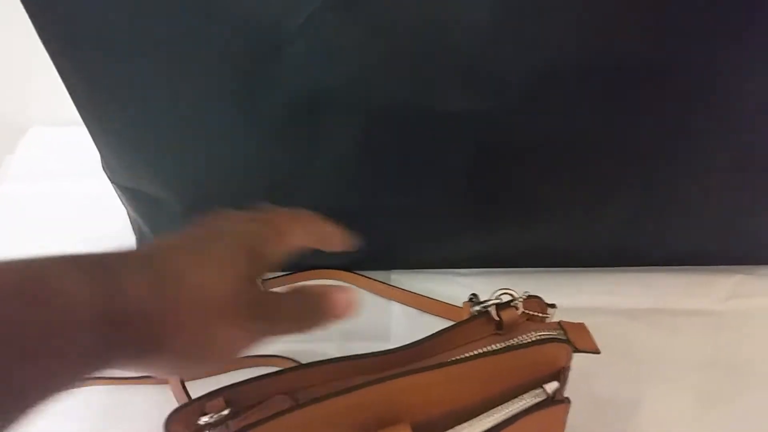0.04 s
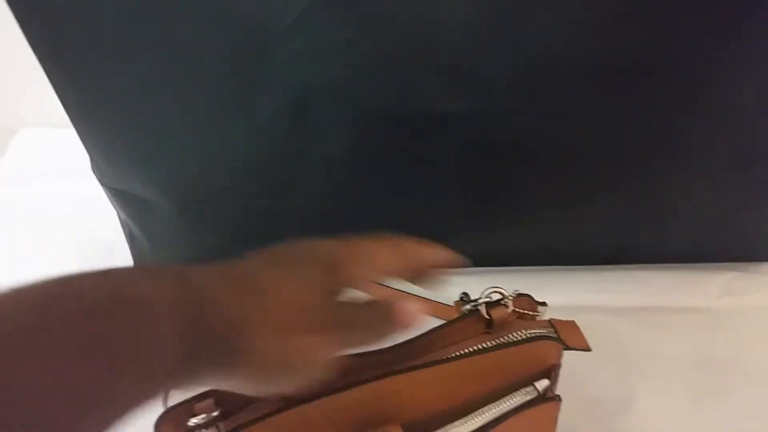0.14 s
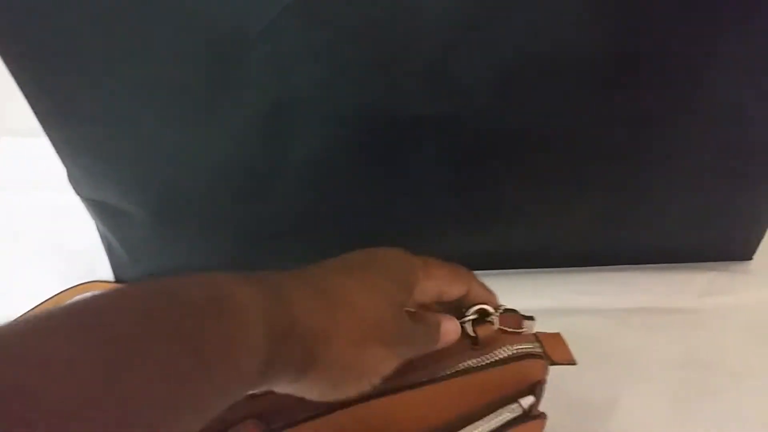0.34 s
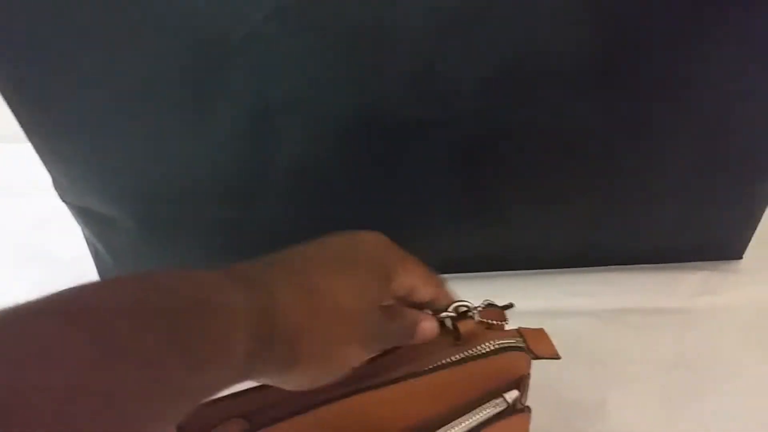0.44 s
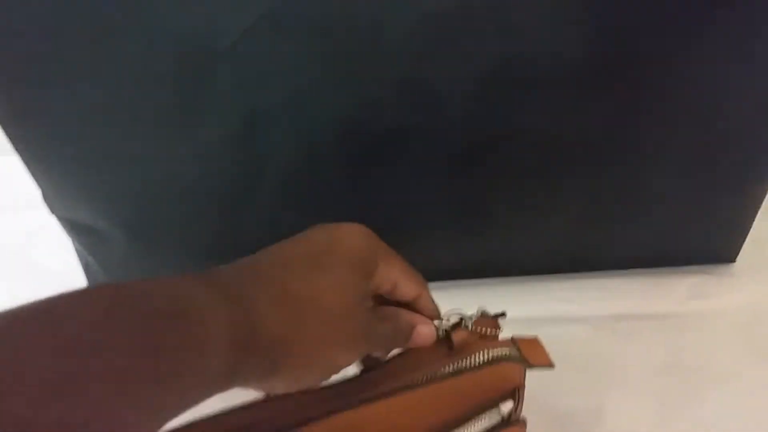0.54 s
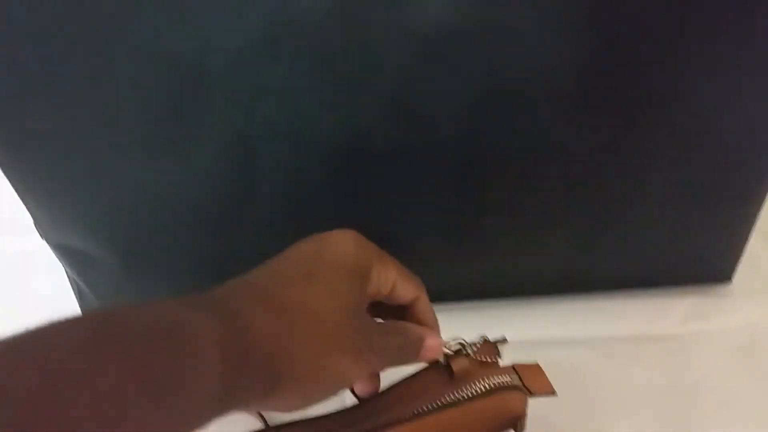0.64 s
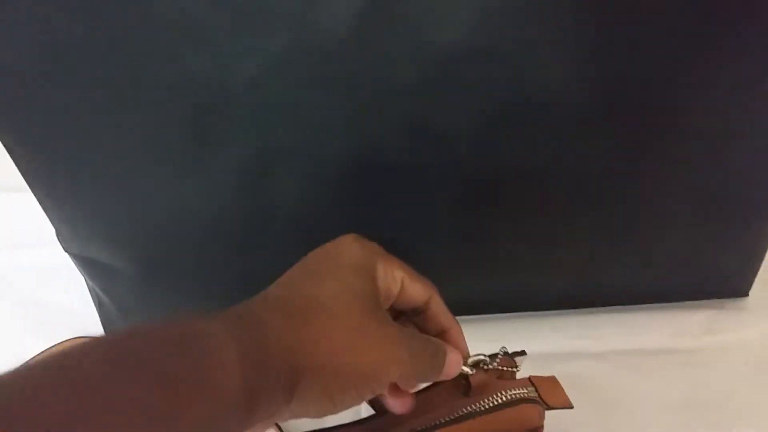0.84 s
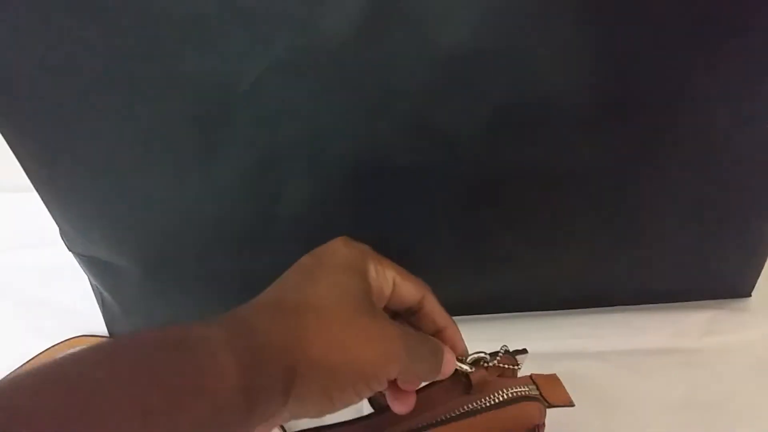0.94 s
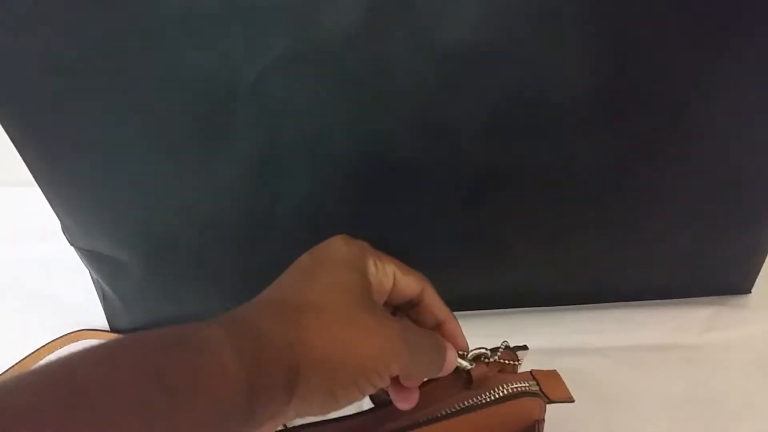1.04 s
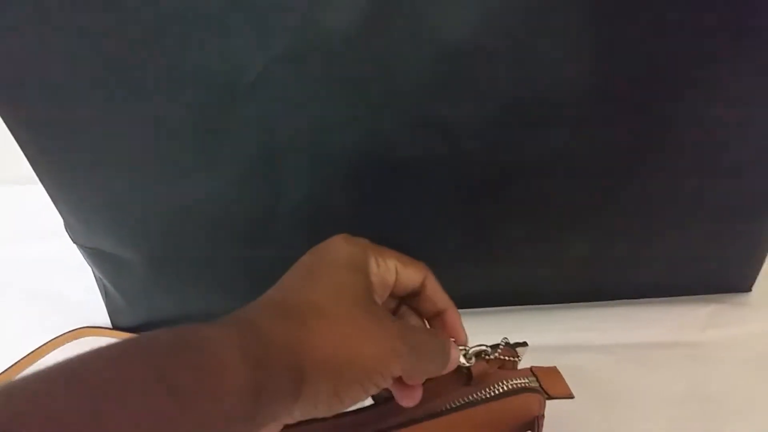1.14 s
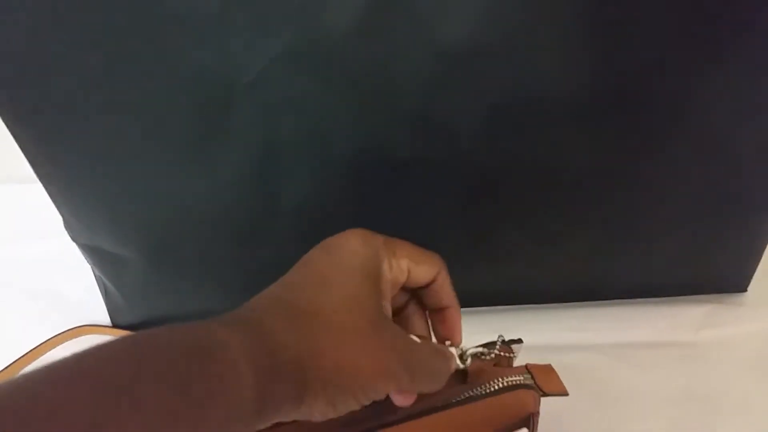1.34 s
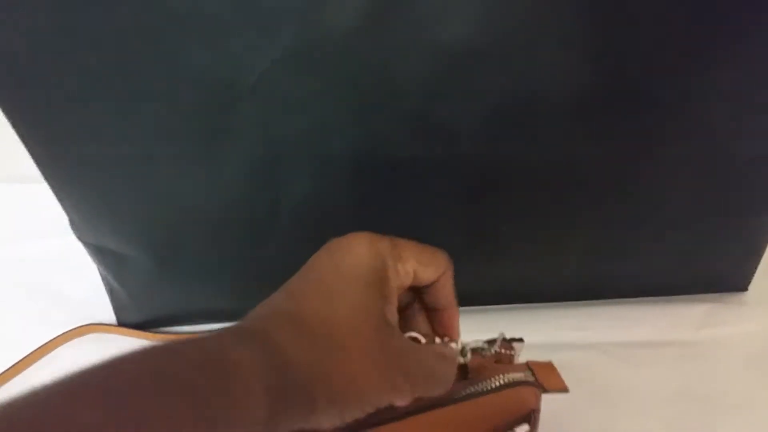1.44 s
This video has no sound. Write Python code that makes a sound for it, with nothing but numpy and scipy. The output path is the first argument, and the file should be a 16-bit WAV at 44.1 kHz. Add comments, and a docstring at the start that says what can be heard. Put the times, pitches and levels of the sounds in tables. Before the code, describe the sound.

One loud, sharp snap of a steel clasp comes with a hollow knock from a leather bag, echoing briefly in a small, quiet room. Soft finger thuds, light rubbing and a few faint ticks follow.

```python
"""A small, bare room. A hand meets the metal clasp of a leather bag: the steel snaps twice, the hollow
body knocks and rings, and the walls answer. The fingers then bump and brush the leather; their rings
tick faintly before and after. Two microphone ports colour the treble differently, over low room noise
and their own hiss."""
import sys
import numpy as np
from scipy import signal
from scipy.fft import rfft, irfft
from scipy.io import wavfile

SR = 44100
rng = np.random.default_rng(int(sys.argv[2]) if len(sys.argv) > 2 else 0)


def transcribe(u):
    """Save the signal u as a 16-bit wav file named by the first command-line argument.

    u: samples, shape (n,) or (channels, n), limited to [-1, 1]; the rate is SR.
    q: integer samples, one column per channel.
    """
    v = np.clip(np.atleast_2d(u).T, -1, 1)
    q = np.round(v * 32767).astype(np.int16)
    wavfile.write(sys.argv[1], SR, q)


N = 66150

# Clasp snaps. Each row: start in seconds, level in dB, push on the body in dB, chatter t60 in seconds.
CLASP_SNAPS = [(0.2139, -4.5, -9, 0.0077), (.2173, -3, 0.5, .011)]
# Stereo likeness of the noises. Each row: frequency in Hz, left-right correlation.
CORRELATION = [(60, 0.47), (300, 0.34), (700, .65), (1300, -0.29), (2500, 0.0021), (5000, 0.1)]


def amp(db):
    return 10 ** (np.asarray(db) / 20)


def unit_rms(x):
    return x / np.sqrt(np.mean(x ** 2) + 1e-20)


def grid_hz():
    return np.fft.rfftfreq(2 * N, 1 / SR)


def curve(points, column=1):
    """One column of (Hz, ..) rows on the FFT grid, interpolated in log frequency."""
    table = np.transpose(points)
    return np.interp(np.log(grid_hz() + 1), np.log(table[0] + 1), table[column])


def stereo_gain(points):
    return amp([curve(points, 1), curve(points, 2)])


def filtered(x, response):
    return irfft(rfft(x, 2 * N) * response)[..., :N]


def min_phase(gain):
    cepstrum = irfft(np.log(gain))
    cepstrum[..., 1:N] *= 2
    cepstrum[..., N + 1:] = 0
    return np.exp(rfft(cepstrum))


def since(start_s):
    return np.maximum(np.arange(N) / SR - start_s, 0)


def envelope(t, t60_s, rise_s):
    return np.exp(-np.log(1000) * t / t60_s) * (1 - np.exp(-t / rise_s))


def mode(t, hz, t60_s, rise_s):
    return envelope(t, t60_s, rise_s) * np.sin(2 * np.pi * hz * t)


def pulse(at_s):
    return signal.unit_impulse(N, int(np.clip(round(at_s * SR), 0, N - 1)))


def noise(gain, correlation=CORRELATION):
    """Coloured stereo noise of rms 1."""
    angle = np.arccos(np.clip(curve(correlation), -1, 1)) / 2
    mid, side = rfft(rng.standard_normal((2, 2 * N))) * [np.cos(angle), np.sin(angle)]
    return unit_rms(irfft(np.array([mid + side, mid - side]) * gain)[:, :N])


def background():
    """Steady low room noise and the hiss of the ports."""
    # Each row: frequency in Hz, left gain in dB, right gain in dB.
    spectrum = [(25.09, -1, -1.5), (90.5, -2, -1.5), (200, -8.5, -8), (600, -9, -15), (1430, -19, -18.5),
                (2850, -18, -20), (3250, -13.5, -25.5), (4200, -3, -25), (5010, -11.5, -31),
                (6300, -26, -32), (8500, -26, -28.5), (11100, -26, -23.5), (15800, -18.5, -20.5)]
    # Each row: frequency in Hz, left-right correlation.
    correlation = [(60, 0.29), (130, .55), (300, .3), (700, 0.0039)]
    return amp(-58) * noise(stereo_gain(spectrum), correlation)


def rubbing():
    """Skin on leather: short airy strokes over a low, uneven rub."""
    # Each row: centre in seconds, level in dB, Gaussian width in seconds.
    strokes = [(0.454, -52, 0.026), (.53, -56.5, 0.016), (.62, -59, 0.033), (.71, -64, 0.026),
               (.81, -62, 0.028)]
    # Each row: time in seconds, level in dB.
    rub_levels = [(0, -65), (.35, -88), (.58, -53.5), (.72, -53), (.9, -71), (1.5, -70)]
    # Each row of both: frequency in Hz, gain in dB.
    stroke_spectrum = [(300, -35), (1500, 0), (6000, -1), (8200, -4.5), (9800, 2.5), (13000, 3),
                       (16000, -1.5)]
    rub_spectrum = [(30, -4), (110, 6.5), (330, -2.5), (600, -15), (1200, -20.5), (5000, -51.5)]
    t = since(0)
    brush = sum(amp(db) * np.exp(-0.5 * ((t - at_s) / width_s) ** 2) for at_s, db, width_s in strokes)
    rub = amp(np.interp(t, *np.transpose(rub_levels)))
    return brush * noise(amp(curve(stroke_spectrum))) + rub * noise(amp(curve(rub_spectrum)))


def ring_ticks():
    """Tiny dry contacts between the finger rings."""
    # Each row: start in seconds, level in dB, left minus right in dB.
    contacts = [(0.1106, -42.5, 5), (0.734, -53, -9), (0.901, -48, 7), (1.1552, -56, -2)]
    # Each row: frequency in Hz, gain in dB.
    spectrum = [(500, -14), (1700, -9), (2700, 5), (4000, -7), (7000, -1.5), (12000, 2.5), (16000, -3)]
    out = np.zeros((2, N))
    for start_s, db, pan_db in contacts:
        gain = amp([[db + pan_db / 2], [db - pan_db / 2]])
        out += gain * envelope(since(start_s), t60_s=0.0088, rise_s=0.00037) * noise(amp(curve(spectrum)))
    return out


def clasp():
    """Each snap is a hard contact, a few milliseconds of chatter and a brief ring of the steel."""
    # Each row: frequency in Hz, gain in dB.
    spectrum = [(60, -15), (240, 2), (450, -3.5), (850, 6.5), (1200, -5.5), (2100, 5), (3500, -7.5),
                (5400, -3), (7500, -13), (10500, -13), (16000, -20.5)]
    # Each row: frequency in Hz, level in dB, t60 in seconds.
    steel_modes = [(1560, 3.5, 0.043), (2170, 0, 0.064), (2650, -1, .05), (5390, 6, .014),
                   (5960, -4.5, .018), (10300, -4, 0.013)]
    chatter_gain = amp(curve([(300, -17), (2000, -1.5)]))
    contacts, ring = np.zeros((2, N)), np.zeros(N)
    for start_s, db, _, chatter_t60_s in CLASP_SNAPS:
        t = since(start_s)
        chatter = noise(chatter_gain) * envelope(t, chatter_t60_s, rise_s=0.0002)
        chatter /= np.sqrt(np.sum(chatter ** 2) / 2)
        contacts += amp(db) * (pulse(start_s) + amp(5) * chatter)
        for hz, mode_db, t60_s in steel_modes:
            ring += amp(db + mode_db) * mode(t, hz, t60_s, rise_s=0.0006)
    return amp(10.5) * filtered(contacts, min_phase(amp(curve(spectrum)))) + amp(-22) * ring


def bag_knock():
    """The leather thuds under the snaps; the hollow bag clonks, lands on its support and rings on."""
    # Each row: start in seconds, level in dB.
    landings = [(0.2259, -4.5), (0.2296, -0.5), (0.2563, -3)]
    # Each row: frequency in Hz, gain in dB.
    landing_spectrum = [(20, -33), (50, -16), (120, -2), (260, -0.5), (420, -3), (700, -4.5), (1100, -14.5),
                        (2500, -26), (7000, -48.5), (16000, -67.5)]
    # Each row: frequency in Hz, t60 in seconds, drive by the snaps in dB, drive by the landings in dB.
    clonk_modes = [(816, .042, -6.5, -11.5), (640.8, 0.089, -29.5, -21)]
    # Body and support. Each row: frequency in Hz, level in dB, t60 in seconds.
    body_modes = [(108.2, -20, 0.49), (170.16, -5, 0.39), (201, -10, .35), (285.8, -1.5, .38),
                  (332.4, -11.5, 0.39), (386, -14, .34), (531.6, -8, 0.25), (563, -9, 0.38),
                  (629.6, -0.5, 0.24), (830.6, -7, 0.32), (887, -10, 0.19), (1494, -14, 0.17),
                  (1954, -19.5, 0.43), (2780, -23.5, 0.59)]
    last_snap_s = CLASP_SNAPS[-1][0]
    thud = sum(amp(db) * mode(since(start_s), hz=243, t60_s=0.022, rise_s=0.0011)
               for start_s, db, _, _ in CLASP_SNAPS)
    clonk = np.zeros(N)
    for hz, t60_s, snap_db, landing_db in clonk_modes:
        drives = [(start_s, push_db + snap_db) for start_s, _, push_db, _ in CLASP_SNAPS]
        drives += [(start_s, db + landing_db) for start_s, db in landings[:2]]
        level = sum(amp(db) * envelope(since(start_s), t60_s, rise_s=0.0028) for start_s, db in drives)
        clonk += level * np.sin(2 * np.pi * hz * (since(0) - last_snap_s))
    pushes = sum(amp(db) * pulse(start_s) for start_s, db in landings)
    knocks = filtered(pushes, min_phase(amp(curve(landing_spectrum))))
    ring = sum(amp(db) * mode(since(last_snap_s), hz, t60_s, rise_s=0.0039)
               for hz, db, t60_s in body_modes)
    return amp(-10) * thud + clonk + amp(24.5) * knocks + amp(-18) * ring


def room_tail(start_s):
    """Diffuse sound; each frequency dies at its own rate."""
    # Each row: frequency in Hz, gain in dB.
    spectrum = [(30, -28.5), (80, -5.5), (170, -6.5), (300, -1), (430, -0.5), (800, 2), (1150, -3.5),
                (2200, -9.5), (3400, -12.5), (5500, -19), (7500, -24), (10500, -29.5), (16000, -33)]
    # Each row: frequency in Hz, t60 in seconds.
    decay_times = [(100, 0.46), (300, .55), (800, 0.41), (2000, 0.53), (5000, 0.52), (10000, 0.52),
                   (16000, 0.63)]
    rise_s = 0.011
    hz, frame_s, bins = signal.stft(noise(amp(curve(spectrum))), SR, nperseg=256)
    band_hz, band_t60_s = np.transpose(decay_times)
    t60_s = np.interp(np.log(hz + 1), np.log(band_hz), band_t60_s)
    decay = np.exp(-np.log(1000) * np.maximum(frame_s - start_s, 0) / t60_s[:, None])
    return signal.istft(bins * decay, SR)[1][:, :N] * (1 - np.exp(-since(start_s) / rise_s))


def room_answer(snaps):
    """The walls return the snaps as distinct echoes, a late scattered cluster and a diffuse tail."""
    # Each row: delay in seconds, gain in dB.
    reflections = [(.0275, -22), (.0352, -19.5), (.0425, -19.5)]
    # Each row: frequency in Hz, gain in dB.
    cluster_spectrum = [(100, -10), (550, 0), (1200, -6), (2300, -5), (3500, -9), (5500, -9), (16000, -17)]
    start_s, cluster_delay_s = CLASP_SNAPS[0][0], 0.044
    taps = sum(amp(db) * pulse(delay_s) for delay_s, db in reflections)
    echoes = filtered(snaps, rfft(taps, 2 * N))
    cluster = noise(amp(curve(cluster_spectrum)))
    cluster *= envelope(since(start_s + cluster_delay_s), t60_s=0.09, rise_s=0.005)
    return echoes + amp(-28) * cluster + amp(-17.5) * room_tail(start_s)


def finger_bumps():
    """Fingers nudge the bag: damped thuds with a little scuff and reverberation."""
    # Each row: start in seconds, level in dB, pitch in Hz, t60 in seconds.
    nudges = [(.438, -41, 803, 0.067), (.439, -37.5, 312, 0.055), (.449, -40, 640, 0.052),
              (0.446, -43, 136, 0.11), (.531, -37, 130, 0.055), (0.557, -43.5, 146, 0.062),
              (0.573, -37, 232, 0.018), (.586, -42, 272, .016), (.615, -53, 166, 0.052),
              (0.641, -51.5, 380, .025), (.678, -44.5, 102, 0.13), (.694, -42, 290, 0.012),
              (.814, -41, 123.3, 0.045), (0.849, -51, 173.5, 0.13), (.872, -51.5, 421, 0.026),
              (1.417, -53.5, 115, 0.058)]
    direct = np.zeros((2, N))
    for start_s, db, hz, t60_s in nudges:
        t = since(start_s)
        scuff_spectrum = [(hz / 8, -14), (hz / 2, 0), (hz * 1.66, -3), (hz * 5, -34), (hz * 20, -65)]
        scuff = amp(-6) * noise(amp(curve(scuff_spectrum)))
        shape = envelope(t, t60_s, rise_s=0.0021)
        direct += amp(db) * shape / shape.max() * (np.sin(2 * np.pi * hz * t) + scuff)
    reverb = filtered(direct, rfft(room_tail(0), 2 * N))
    return direct + amp(-9.5) * np.std(direct) * unit_rms(reverb)


def microphone_ports(sound):
    """Each port colours the treble its own way; both shed the deepest bass."""
    # Each row: frequency in Hz, left gain in dB, right gain in dB.
    response = [(200, 0, 0), (895, -0.5, -0.5), (2376, -0.5, 4), (3050, -1, -5), (4536, 0, -8),
                (5620, 6.5, -16.5), (6586, 0, -11.5), (7950, -0.5, -0.5), (9800, -12.5, 5),
                (12500, -10.5, 1), (16000, -9, -3)]
    low_cut_hz = 30
    high_pass = 1j * grid_hz() / (low_cut_hz + 1j * grid_hz())
    return filtered(sound, min_phase(stereo_gain(response)) * high_pass)


def scene():
    """Clasp, bag and room through the ports, plus ticks and background."""
    snaps = clasp()
    sound = snaps + bag_knock() + room_answer(snaps) + finger_bumps() + rubbing()
    return microphone_ports(sound) + ring_ticks() + background()


def record(dry):
    """Soft limit at full scale, then a steep low-pass."""
    top_hz = 16000
    limited = dry / (1 + np.abs(dry) ** 8) ** (1 / 8)
    return filtered(limited, 1 / np.sqrt(1 + (grid_hz() / top_hz) ** 200))


dry = scene()
out = record(dry)
transcribe(out)
```